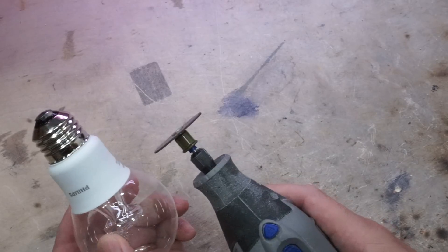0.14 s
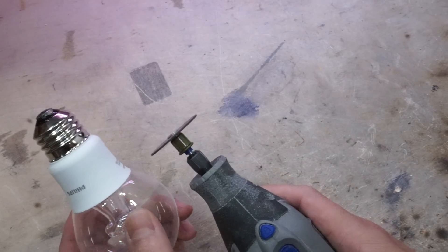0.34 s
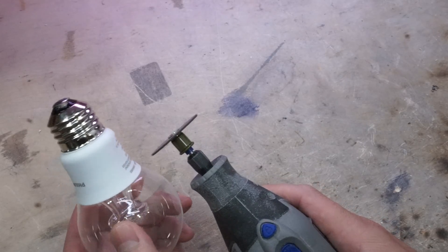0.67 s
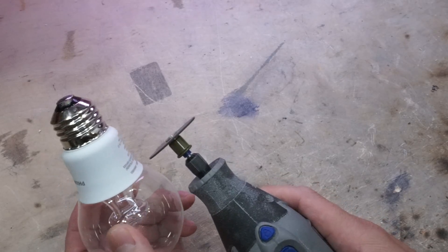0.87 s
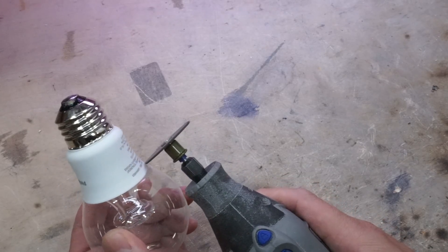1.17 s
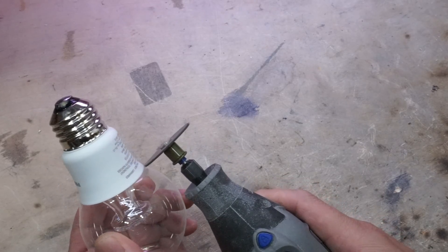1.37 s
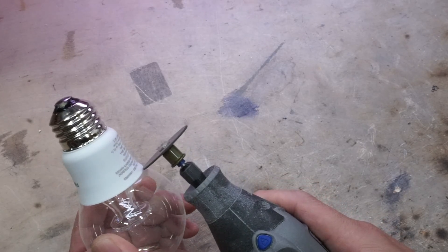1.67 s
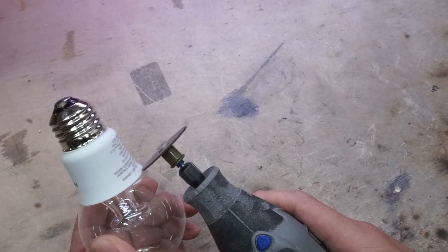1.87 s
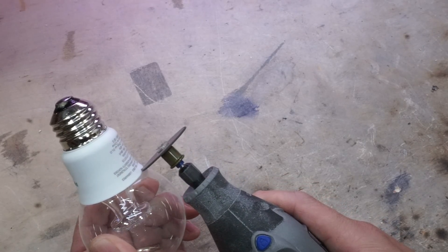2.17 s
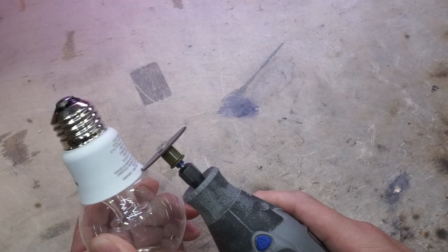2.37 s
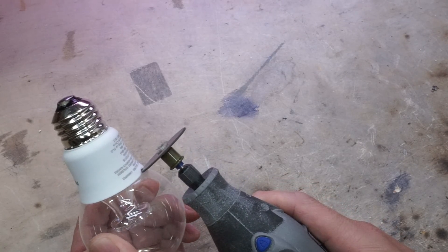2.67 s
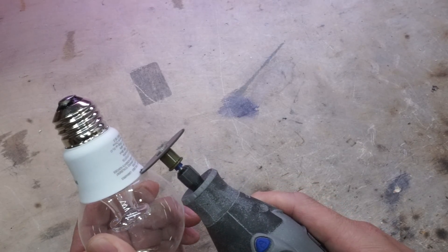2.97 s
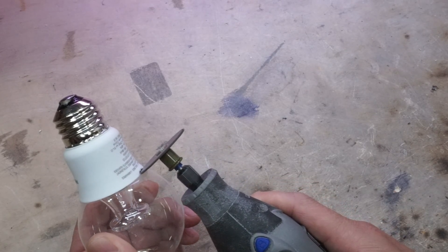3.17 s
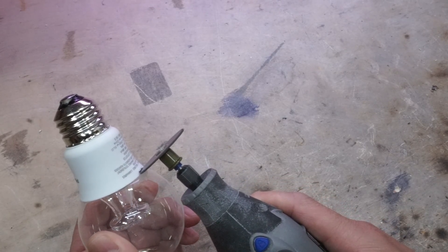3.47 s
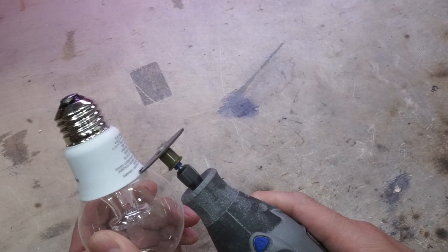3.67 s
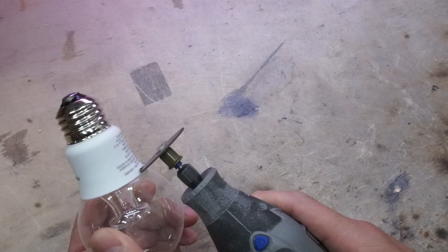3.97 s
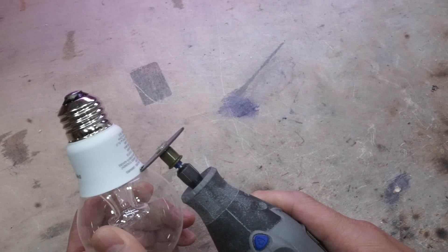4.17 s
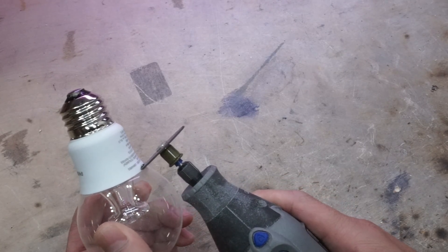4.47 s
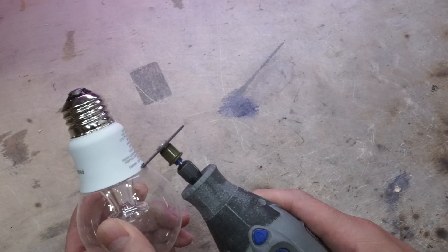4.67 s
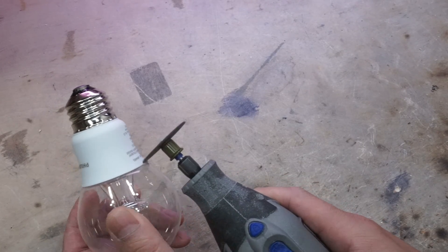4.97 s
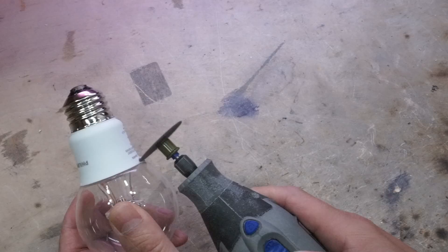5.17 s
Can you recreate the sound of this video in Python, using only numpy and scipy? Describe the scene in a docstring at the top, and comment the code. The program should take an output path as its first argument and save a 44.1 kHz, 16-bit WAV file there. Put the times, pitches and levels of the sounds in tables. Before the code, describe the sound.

Small high-speed motor starts with ticks and a growling rise, whines with rushing air, then its disc grinds thinly on a bulb collar.

```python
"""A handheld rotary tool clicks on over a workbench, and its motor buzzes with the mains as it spins up.
At full speed its fan whines and blows, as steady tones tied to the shaft and as coloured noise.
Then its cutoff wheel is set against the plastic collar of a light bulb: the shaft slows, its own sound recedes.
The wheel's high spot strikes the collar once a turn and the rim rasps on it as shaped noise.
At last the sound breaks off."""
import sys
import numpy as np
from scipy import signal
from scipy.fft import rfft, irfft
from scipy.io import wavfile
from scipy.ndimage import uniform_filter1d, map_coordinates

SR = 44100
rng = np.random.default_rng(int(sys.argv[2]) if len(sys.argv) > 2 else 0)


def transcribe(signal):
    """Save signal, clipped to [-1, 1], as a 16-bit WAV file at the path in sys.argv[1]."""
    frames = np.atleast_2d(signal).T
    limited = np.clip(frames, -1, 1)
    pcm = np.round(limited * 32767).astype(np.int16)
    wavfile.write(sys.argv[1], SR, pcm)


N = 234472
TIME = np.arange(N) / SR
MAINS_HZ = 60
FREE_HZ = 334  # shaft turns per second without load
START_S, AT_SPEED_S = .055, .57  # the soft start eases the shaft up to speed between these times
SURGE_S, EBB_S = (.1, .23), (.57, .6)  # the starting current builds up, then ebbs


def motor(turns, current):
    """The slots buzz with each surge of current; shaft, fan and coils add steady tones."""
    starting = undb(-42 * (1 - ramp(*SURGE_S))) * ramp(START_S, SURGE_S[0])
    straining = 1 - ramp(*EBB_S)
    slots = slot_tones(turns, current)
    buzz = housing_buzz(slots, straining)
    growl = starting_growl(slots, current, straining)
    tones = overtone(turns) + fan_whine(turns) + bearing_rattle(turns) + coil_hum()
    in_room = room((buzz + growl) * starting + tones, wet_db=-13, t60=.1)
    return in_room + shaft_hum(turns)


# armature slots passing the poles, before the housing colours them:
# [multiple of a turn, level/dB, left minus right/dB]
SLOT_TONES = [(8, 0, -3), (16, 1, -3), (24, -1, -3), (32, -6, 0), (40, -1, 0)]


def slot_tones(turns, current):
    """Armature slots pass the poles; each current surge nudges the armature and so shifts their phase."""
    # the armature also judders while it accelerates
    judder = .008 * walk(260) * (1 - ramp(.3, .55))
    nudge_free, nudge_cut = -.0082, .026  # turns per surge, running free and cutting
    nudge = nudge_free + (nudge_cut - nudge_free) * ramp(1.7, 2.7)
    nudged = turns + nudge * np.sin(2 * np.pi * 2 * MAINS_HZ * TIME) + judder
    return lines(nudged, SLOT_TONES, waver_db=.16) * current


# how strongly the housing passes each pitch: [f/Hz, level/dB]
HOUSING_COLOUR = [(600, -35), (1500, -16), (2100, -5), (2550, -0.5), (2615, 1.5), (2700, 1), (2810, -6),
                  (3500, -16), (4200, -3), (5000, -6.5), (5600, -14.5), (6800, -12.5), (8000, -15),
                  (10000, -5), (11000, -8.5)]
# course of the buzz, before a small trim and the starting boost: [t/s, level/dB]
BUZZ_LEVEL = [(0.62, -26.5), (0.95, -30), (1.53, -30), (1.56, -35), (1.75, -28), (2.36, -44.5),
              (2.65, -32.5), (2.8, -34), (2.84, -46.5), (4.67, -43), (4.9, -34)]


def housing_buzz(slots, straining):
    """The slot tones reach the ear through the housing, louder under the starting strain."""
    buzz = np.array([colour(side, HOUSING_COLOUR) for side in slots])
    trim_db, strain_boost_db = -1.02, 3
    return buzz * undb(curve(BUZZ_LEVEL) + trim_db + strain_boost_db * straining)


def starting_growl(slots, current, straining):
    """Under the starting strain, slots and sparking brushes shake a resonance of the housing."""
    hz, width_hz = 2432, 450
    brushes = unit(band(rng.standard_normal(N), hz, 1500)) * current
    shaking = slots + .7 * brushes
    growl = band(band(shaking, hz, width_hz), hz, width_hz)
    return growl * undb(-28) * straining


# strength of the overtone: (free level/dB, share of tool level followed, change per Hz of slowing/dB)
OVERTONE_LAW = (-34.5, 0.86, -0.57)


def overtone(turns):
    """A clean tone midway between the first two slot tones, and one on the second."""
    # the middle tone grows by 6 dB as the groove deepens
    gain = part_gain(OVERTONE_LAW) * undb(6 * ramp(3.74, 4.1))
    middle = lines(turns, [(12, .0009, -8)], waver_db=1.54) * gain
    second = lines(turns, [(16, -52.5, 0)], waver_db=2.5)
    return (middle + second) * ramp(.36, .62)


# tones of the fan, relative to its course: [multiple of a turn, level/dB, left minus right/dB]
FAN_TONES = [(15, -30, 6), (17, -23, 7), (24, 1.5, -4), (25, -20, -10.5), (29, -33.5, -7), (30, -22.5, -8),
             (31, -26, -6.5), (32, -18.5, 13), (33, -20.5, -11)]
# course of the whine until the wheel touches, before the law below: [t/s, level/dB]
FAN_LEVEL = [(0.59, -23), (1.12, -24), (1.19, -29), (1.35, -25.5), (1.53, -24.5), (1.57, -30.6),
             (1.63, -26), (1.86, -29.5), (2.04, -39.5)]
# further strength: (free level/dB, share of tool level followed, change per Hz of slowing/dB)
FAN_LAW = (2.8, .1, -.2)


def fan_whine(turns):
    """The fan sings in tones tied to the shaft, faintly on the way up and fully once at speed."""
    rise = .35 * ramp(.3, .44) + .65 * ramp(.55, .58)
    return lines(turns, FAN_TONES, waver_db=1.65) * undb(curve(FAN_LEVEL)) * part_gain(FAN_LAW) * rise


# strength of the steady rattle: (free level/dB, share of tool level followed, change per Hz of slowing/dB)
RATTLE_LAW = (-39.5, 1, -0.41)
# added rattle while the wheel rests only lightly: [start t/s, end t/s, level/dB]
RATTLES = [(1.944, 2.11, -34.5), (2.574, 2.78, -43.5), (4.805, 4.93, -43)]


def bearing_rattle(turns):
    """The fifth multiple of a turn flutters as the shaft shifts in its bearings."""
    play = .015 * walk(50)
    loose = part_gain(RATTLE_LAW) * ramp(.48, .56)
    for start_s, end_s, db in RATTLES:
        loose = loose + undb(db) * swell(start_s, end_s, fade_s=.063)
    return lines(turns + play, [(5, -3.5, -2)], waver_db=1) * loose


def coil_hum():
    """The heavy starting current makes the field coils hum at six times the mains."""
    hum = np.sin(2 * np.pi * 6 * MAINS_HZ * TIME)
    return hum * undb(-51) * ramp(.19, .2) * (1 - ramp(.33, .52))


# strength of the once-a-turn and thrice-a-turn tones:
# (free level/dB, share of tool level followed, change per Hz of slowing/dB)
UNBALANCE_LAW = (-50.5, 1.6, -1.48)
HUM_LAW = (-40.5, 0.96, -.52)


def shaft_hum(turns):
    """An unbalanced shaft sounds once a turn, with a hum at three times that pitch."""
    unbalance = lines(turns, [(1, .011, -1.7)], waver_db=1.2) * part_gain(UNBALANCE_LAW)
    hum = lines(turns, [(3, -.8, -1.2)], waver_db=.8) * part_gain(HUM_LAW)
    return (unbalance + hum) * ramp(.43, .54)


def wheel(turns):
    """The wheel settles on the collar, rasps and bites into it, and flexes its mandrel."""
    contact, strike, grit = rim_contact(turns)
    # the sideways push bends the mandrel twice a turn
    flex = lines(turns, [(2, -66, 2)], waver_db=1) * (1 - ramp(3, 4.9))
    return (rim_rasp(contact) + deep_bites(contact, strike, grit) + flex) * ramp(1.77, 2.02)


def rim_contact(turns):
    """The high spot strikes once a turn; the rest scrapes in a repeating pattern that slowly wears."""
    turn, angle = turns.astype(int), turns % 1
    force = undb(1.8 * rng.standard_normal(N // 100))[turn]  # each turn presses differently
    from_spot = angle - .5
    strike = unit(np.sinc(from_spot * 80) * np.exp(-(from_spot * 20) ** 2))
    rim = rng.standard_normal((64, 128))  # stages of wear by places around the rim
    place = [TIME * 6, angle * rim.shape[1]]
    scrape = unit(map_coordinates(rim, place, order=2, mode="grid-wrap"))
    # pressure peaks at the high spot and dies away over the turn
    pressure = unit(.41 + np.exp(-(from_spot % 1) / .5))
    # loose grains and chips break off at random
    grit = unit(rng.standard_normal(N) * undb(2 * rng.exponential(size=N)))
    rubbing = undb(-6.5) * scrape + undb(-1) * grit
    return force * (strike + pressure * rubbing), strike, grit


# tone colour of the cut: [f/Hz, level/dB]
RASP_COLOUR = [(600, -41.5), (1130, -60.5), (1400, -26), (4000, -21.5), (6300, -17.5), (7600, -3.5),
               (8500, -4.5), (9100, -1.5), (10000, 3.5), (11000, 0.5)]
# course of the rasp, before a fixed 9 dB lift: [t/s, level/dB]
RASP_LEVEL = [(2.0, -36), (2.13, -29), (2.31, -35.5), (2.46, -31), (2.54, -35), (3.23, -29.5), (3.26, -32),
              (3.49, -28.5), (4.9, -34.5)]


def rim_rasp(contact):
    """The contact noise is coloured by the cut; so small a disc radiates no bass."""
    no_bass = signal.butter(4, 500, "high", fs=SR, output="sos")
    rasp = signal.sosfilt(no_bass, colour(contact, RASP_COLOUR))
    # the cut lies to the left and reaches that side one sample sooner
    rasp = room(np.array([rasp, np.roll(rasp, 1)]), wet_db=-8, t60=.05)
    return pan(steady(rasp) * undb(curve(RASP_LEVEL) + 9), 7.1)


# resonances of the bulb's collar, lowest first, each filter used twice:
# [f/Hz, width of one pass/Hz, level of one pass/dB]
COLLAR_RINGS = [(5556, 770, 2.5), (6970, 180, -4), (7680, 880, 7)]
# the wheel bites deeper:
# [start t/s, end t/s, low ring level/dB, high ring level/dB, groove hiss level/dB]
BITES = [(2.04, 2.12, -41, -31, -45), (3.305, 4.042, -39.5, -36, -28.5), (4.2, 4.247, -42, -26.5, -44),
         (4.349, 4.683, -33, -33, -31)]


def deep_bites(contact, strike, grit):
    """Deeper bites ring the collar, and the wheel's flanks hiss against the groove."""
    # the regular strikes ring the collar, so its note is cleaner than the rasp
    ringing = contact + strike
    low, high = (steady(room(body(body(ringing, rings), rings), wet_db=-3, t60=.05))
                 for rings in (COLLAR_RINGS[:1], COLLAR_RINGS[1:]))
    groove_hz, width_hz = 9680, 1250
    hiss = band(band(contact + grit, groove_hz, width_hz), groove_hz, width_hz)
    hiss = pan(steady(room(hiss, wet_db=-6, t60=.05)), 7.1)
    bites = 0
    for start_s, end_s, low_db, high_db, hiss_db in BITES:
        mix = low * undb(low_db) + high * undb(high_db) + hiss * undb(hiss_db)
        bites = bites + swell(start_s, end_s, fade_s=.061) * mix
    return bites


# switch and first jolts of the armature, before a 13 dB lift and the ring's filter:
# [t/s, level/dB, ring f/Hz, decay/s]
CLICKS = [(0.058, -34, 4850, .003), (0.057, -40, 2420, .004), (0.091, -31, 8140, .004),
          (0.12, -31.5, 2700, .005)]


def clicks():
    """Short plastic ticks as the tool is switched on: fading noise bursts through a resonance."""
    out = np.zeros(N)
    for start_s, db, hz, decay_s in CLICKS:
        fade = (TIME >= start_s) * np.exp(-np.abs(TIME - start_s) / decay_s)
        out += undb(db + 13) * band(rng.standard_normal(N) * fade, hz, 970)
    return room(out, wet_db=-8, t60=.1)


# tone colour of the vent air: [f/Hz, level/dB]
AIR_COLOUR = [(70, -49.5), (200, -42), (420, -32.5), (600, -21.5), (800, -10), (1300, -2.5), (1800, -1.5),
              (2300, 3), (3300, 0.5), (6500, -0.5), (9000, 1), (11000, 1.5)]
# strength of the air: (free level/dB, share of tool level followed, change per Hz of slowing/dB)
AIR_LAW = (-20.5, 0.86, -0.22)


def vent_air(current):
    """Cooling air rushes from the vents, throbbing a little with the current, over a faint room tone."""
    # the air begins at once at 0.09 s
    flow = part_gain(AIR_LAW) * undb(-19 * (1 - ramp(*SURGE_S))) * ramp(.09, .09)
    throb = 1 + .059 * (current - 1)
    rush = unit(colour(rng.standard_normal(N), AIR_COLOUR)) * undb(.5 * walk(25)) * throb
    room_tone = undb(-60)
    return pan(room(rush * (flow + room_tone), wet_db=0, t60=.12), -3.2)


# tone colour of the body's rumble: [f/Hz, level/dB]
RUMBLE_COLOUR = [(40, -34), (90, -30.5), (150, -21.5), (220, -16.5), (300, 1), (480, -0.5), (800, 7),
                 (1500, -13)]
# strength of the rumble: (free level/dB, share of tool level followed, change per Hz of slowing/dB)
RUMBLE_LAW = (-47.5, .9, -1.2)


def body_rumble():
    """The tool's body rumbles with the shaft: low noise that weakens as the shaft slows."""
    rumble = unit(colour(rng.standard_normal(N), RUMBLE_COLOUR))
    return room(rumble * part_gain(RUMBLE_LAW) * ramp(.033, .18), wet_db=1.5, t60=.082)


# shaft speed at full start, sagging as the wheel is pressed in: [t/s, turns per second f/Hz]
SPEED = [(0.57, 334.3), (0.67, 335), (1.21, 332.3), (1.85, 335), (1.97, 333.5), (2.3, 323.9), (2.71, 325),
         (2.93, 319.7), (3.25, 322.1), (3.71, 318.4), (3.85, 319), (4.05, 316.5), (4.33, 321.8),
         (4.7, 322.1), (4.87, 329.0), (4.91, 328)]


def shaft_turns():
    """Add up the shaft's speed, with a slight waver, into turns made so far."""
    rise = ramp(START_S, AT_SPEED_S)
    speed_hz = curve(SPEED) * rise ** 2 * (3 - 2 * rise)
    return np.cumsum(speed_hz * (1 + .0005 * walk(30))) / SR


def mains_current():
    """The speed control passes current twice per mains cycle, in short spikes while accelerating."""
    spikiness = .7 + 1 - ramp(.28, .56)
    return steady(np.exp(spikiness * np.cos(2 * np.pi * 2 * MAINS_HZ * TIME)))


# course of the tool's own sound, which its parts follow by their shares: [t/s, level/dB]
TOOL_LEVEL = [(0.62, -35), (0.95, -34.5), (1.22, -32.5), (1.52, -34), (1.59, -37.5), (1.76, -35),
              (2.1, -39.5), (2.27, -45), (2.44, -46.5), (2.6, -41), (2.8, -38.5), (2.86, -49), (3.4, -48),
              (4.65, -48), (4.88, -46.5)]


def part_gain(law):
    """A part's strength follows the tool's level and falls as the load slows the shaft."""
    free_db, share, db_per_hz = law
    sag_hz = np.maximum(FREE_HZ - curve(SPEED), 0)
    tool_change_db = curve(TOOL_LEVEL) + 34.5  # compared with running free
    return undb(free_db + share * tool_change_db + db_per_hz * sag_hz)


def lines(turns, rows, waver_db):
    """Pure tones locked to the shaft, each wavering a little in level."""
    total = 0
    for multiple, db, side_db in rows:
        tone = np.sqrt(2) * np.sin(2 * np.pi * (multiple * turns + rng.random()))
        total = total + pan(tone * undb(db + waver_db * walk(18)), side_db)
    return total


def undb(db):
    """Decibels to gain."""
    return 10 ** (np.asarray(db) / 20)


def unit(x):
    """Scale to rms 1."""
    return x / np.sqrt(np.mean(x ** 2))


def steady(x, span_s=.18):
    """Scale to rms 1 at every moment."""
    power = uniform_filter1d(np.mean(np.atleast_2d(x) ** 2, axis=0), int(span_s * SR))
    return x / np.sqrt(np.abs(power) + 1e-12)


def ramp(start_s, end_s):
    """Rise from 0 to 1 between two times."""
    return np.clip((TIME - start_s) / max(end_s - start_s, 1 / SR), 0, 1)


def swell(start_s, end_s, fade_s):
    """Fade in before the start, hold, fade out after the end."""
    return ramp(start_s - fade_s, start_s) * (1 - ramp(end_s, end_s + fade_s))


def curve(rows):
    """Join [t/s, value] rows by straight lines in time."""
    return np.interp(TIME, *np.transpose(rows))


def walk(rate):
    """Smooth random wandering with a spread near 1; rate is new values per second."""
    return map_coordinates(rng.standard_normal(N // 20), [TIME * rate], order=2, mode="wrap")


def pan(x, db):
    """Place a sound by its left minus right level."""
    return x * undb(np.array([[db], [-db]]) / 2)


def band(x, hz, width_hz):
    """One resonance, gain 1 at its centre."""
    return signal.lfilter(*signal.iirpeak(hz, hz / width_hz, fs=SR), x)


def body(x, modes):
    """Several resonances side by side."""
    return sum(undb(db) * band(x, hz, width_hz) for hz, width_hz, db in modes)


def colour(x, points, size=2048):
    """Filter through [f/Hz, level/dB] points without sounding ahead of the input."""
    hz, db = np.transpose(points)
    grid = np.maximum(np.fft.rfftfreq(size, 1 / SR), 1)
    cepstrum = irfft(np.log(undb(np.interp(np.log(grid), np.log(hz), db))))
    # folding the cepstrum gives the filter minimum phase
    cepstrum[1:size // 2] *= 2
    cepstrum[size // 2 + 1:] = 0
    return signal.fftconvolve(x, irfft(np.exp(rfft(cepstrum))))[:N]


def room(x, wet_db, t60):
    """Direct sound plus dense reflections off bench and walls, whose bass is alike on both sides."""
    t = TIME[:SR // 4]
    mid, side = rng.standard_normal((2, len(t))) * undb(-60 * t / t60)
    side = signal.lfilter(*signal.butter(1, 700, "high", fs=SR), side)
    tails = np.array([mid + side, mid - side])
    tails *= undb(wet_db) / np.sqrt(np.sum(tails ** 2, axis=1, keepdims=True))
    wet = signal.fftconvolve(np.atleast_2d(x), tails, axes=1)[:, :N]
    return (x + wet) / np.hypot(1, undb(wet_db))


def scene():
    """One shaft drives the motor's tones and the wheel; clicks, air and rumble join them."""
    turns = shaft_turns()
    current = mains_current()
    return motor(turns, current) + wheel(turns) + clicks() + vent_air(current) + body_rumble()


def record(dry):
    """The sound breaks off at once; the treble is cut steeply."""
    end_s, top_hz = 4.927, 11040
    cut = dry * (1 - ramp(end_s - .002, end_s + .002))
    return signal.sosfilt(signal.ellip(14, .2, 80, top_hz, fs=SR, output="sos"), cut)


dry = scene()
out = record(dry)
transcribe(out)
```